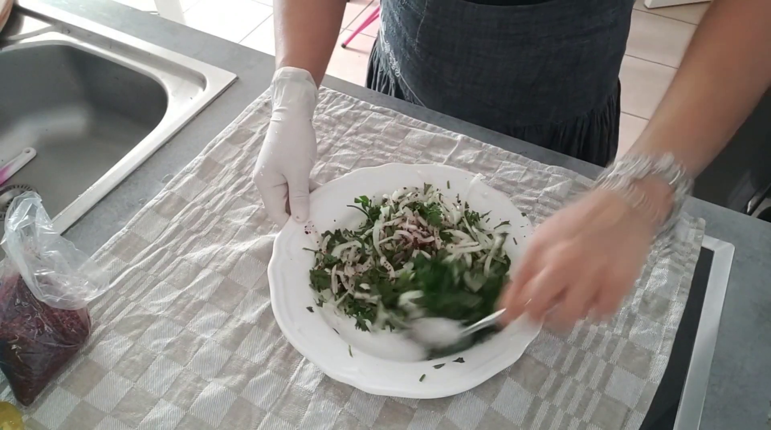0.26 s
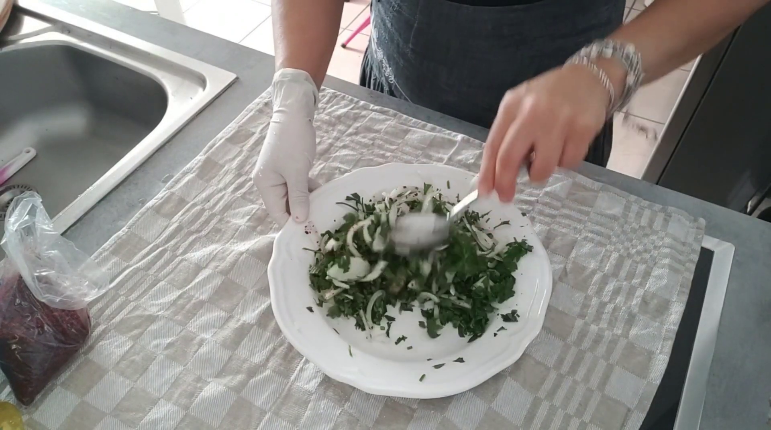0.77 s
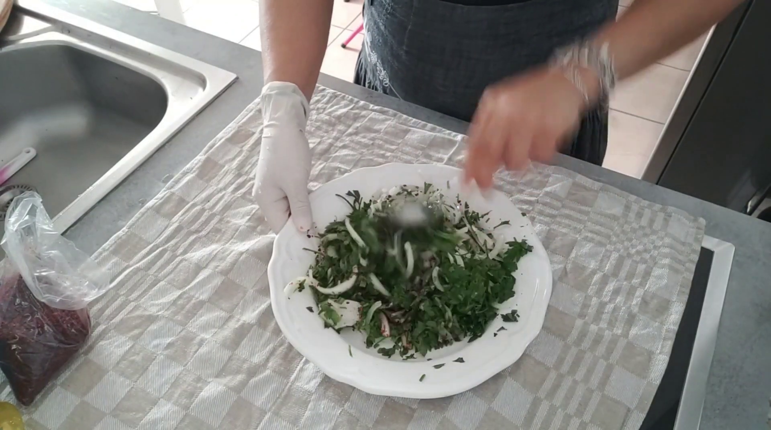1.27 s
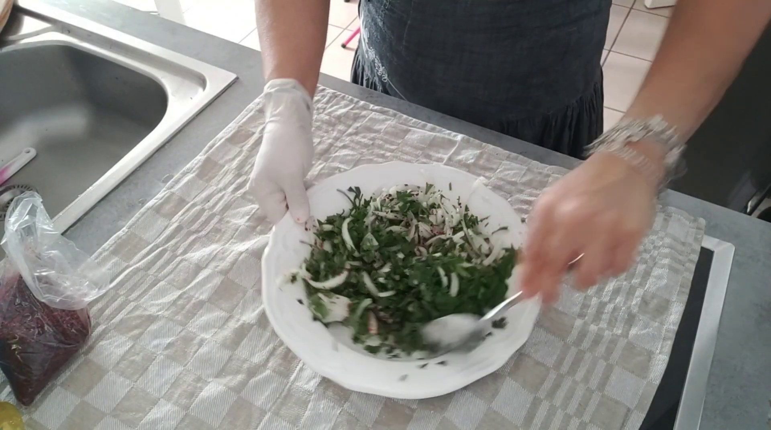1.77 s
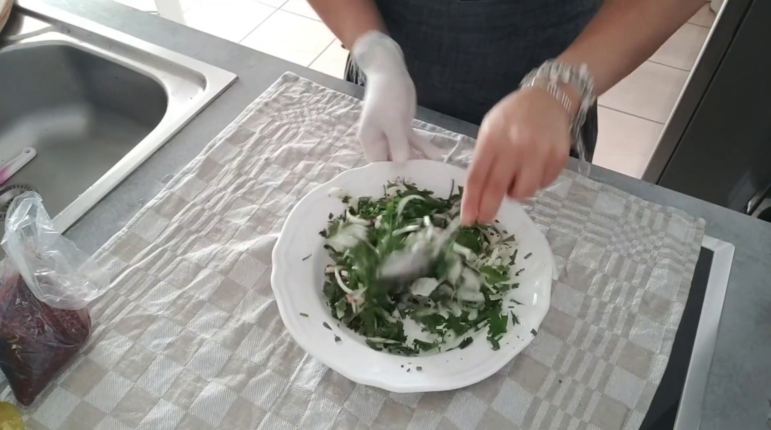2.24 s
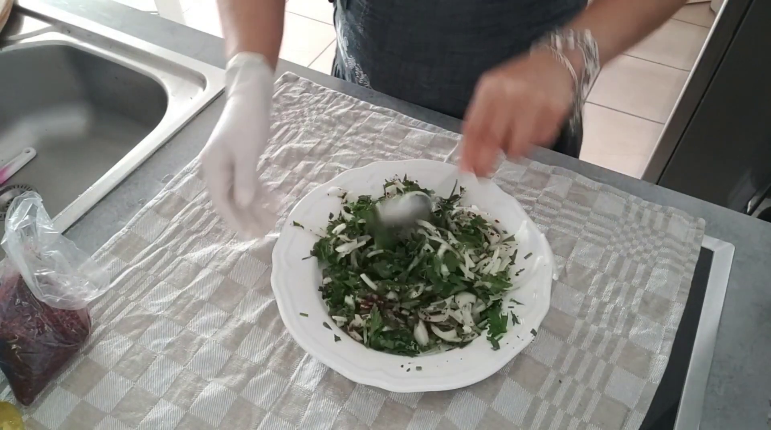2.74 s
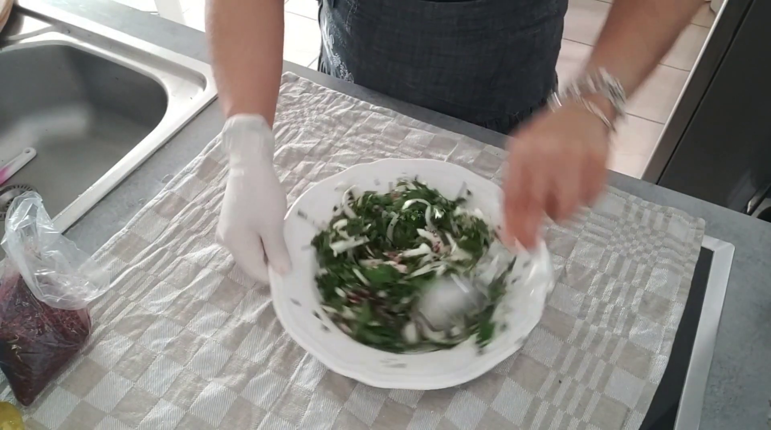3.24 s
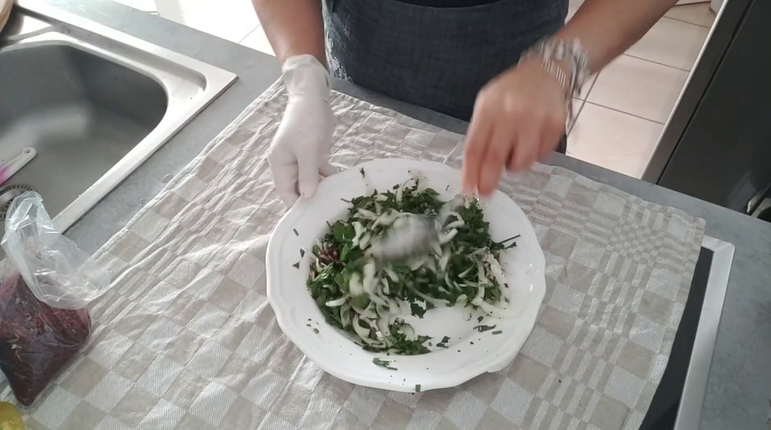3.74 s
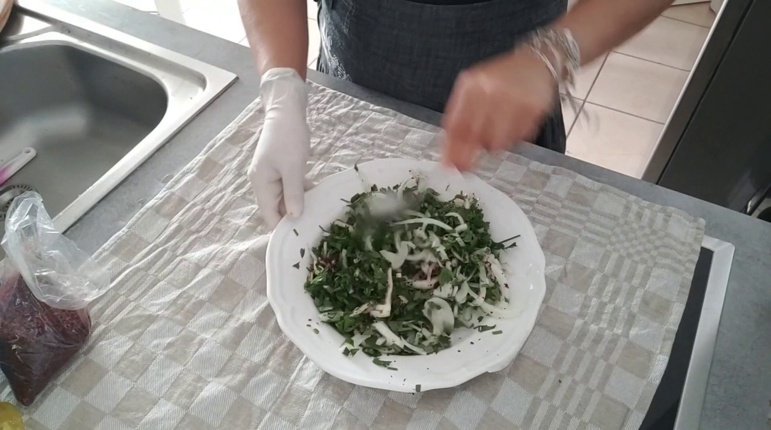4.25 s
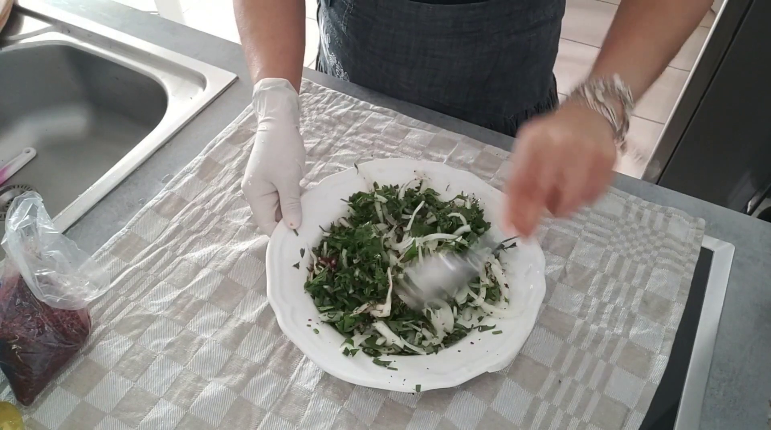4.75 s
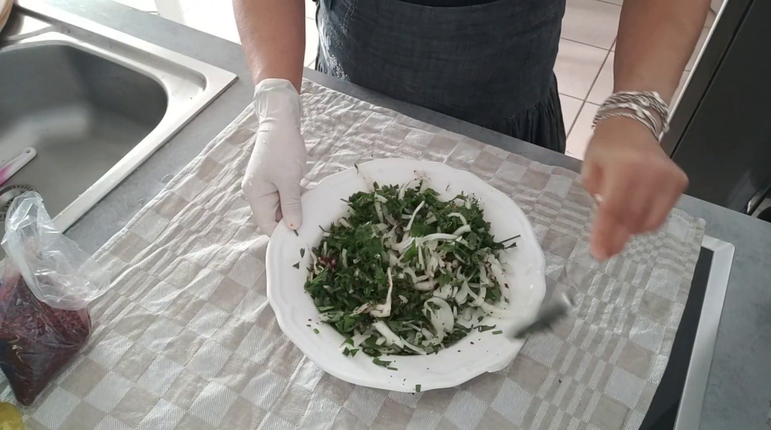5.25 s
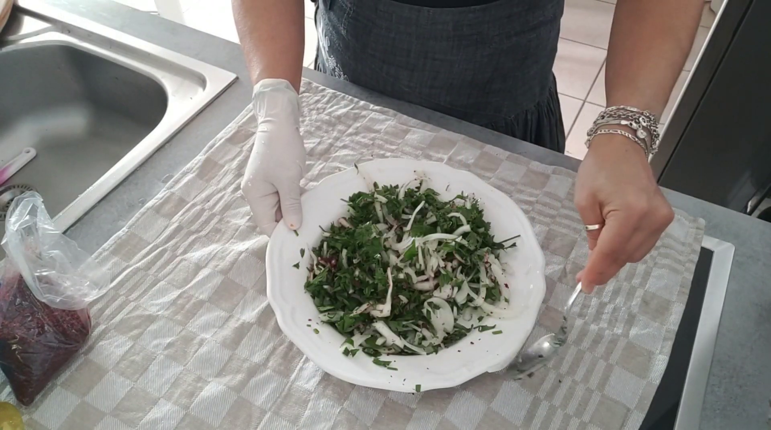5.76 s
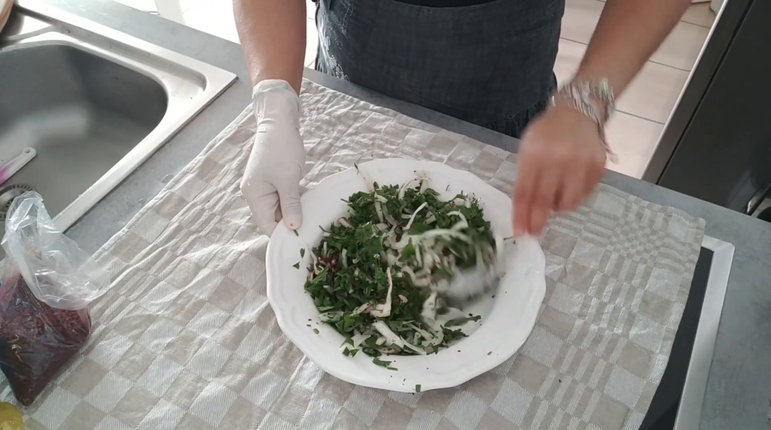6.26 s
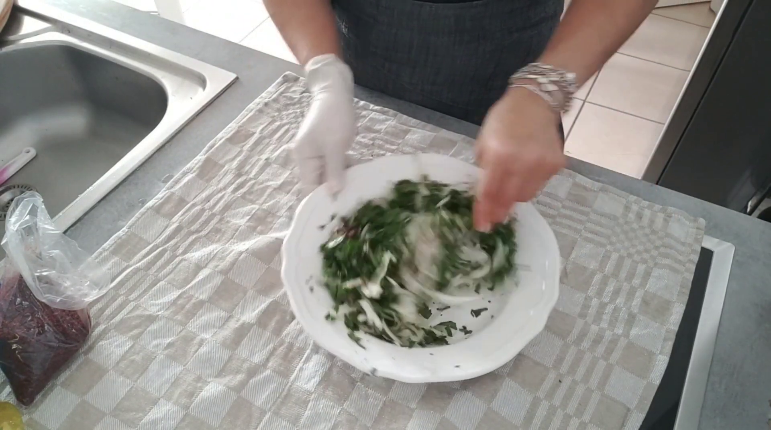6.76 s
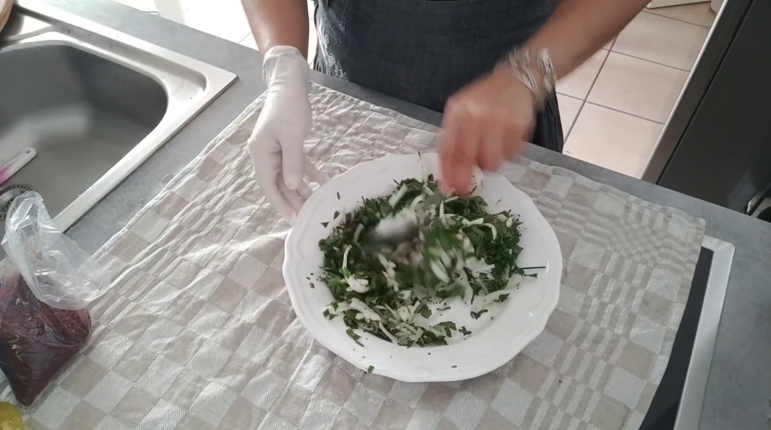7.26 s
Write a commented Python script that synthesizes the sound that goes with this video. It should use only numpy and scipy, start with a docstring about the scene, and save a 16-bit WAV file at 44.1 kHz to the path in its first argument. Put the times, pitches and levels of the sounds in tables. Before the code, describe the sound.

A close stereo microphone in a small, reflective kitchen hears a steel spoon tossing wet salad on a china plate. From the start, soft crisp swishes of leaves come in quick uneven strokes, with a very faint thin squeak around 0.4 seconds and a tick with a dull plate thud near 1.0. At about 1.75 a sharp bright clink rings briefly and drags into a gritty scrape. Rustling continues with small ticks near 2.0 and 2.8; the loudest clink strikes at 3.4, followed by a short scrape. Leafy stirring goes on until about 4.8, then nearly pauses. Light contacts return from 5.9, with chattering taps around 6.2 to 6.3 and another at 6.6, plus muffled thuds on the padded counter. Swishes resume near 6.8, and a crisp tick comes at 7.3. Beneath lie dull rumble, low hum and a distant deep drone, sagging slightly, then climbing slowly in pitch.

```python
"""A spoon clinks and drags on a china plate while wet salad leaves rustle with each stroke of it.
Decaying sine modes make the ringing steel and china, noise bursts the cracks of contact, and swarms
of tiny clicks the leaves; spoon and stalks tick and steel squeaks once on the glaze. A small tiled kitchen
echoes all of these. The plate thuds and rubs on its cloth-covered counter, without echo, over rumble, a low
hum and a far drone that sags a little in pitch and then slowly climbs."""
import sys
import numpy as np
from scipy import signal
from scipy.fft import rfft, irfft, next_fast_len
from scipy.io import wavfile
from scipy.ndimage import uniform_filter1d

SR = 44100
rng = np.random.default_rng(int(sys.argv[2]) if len(sys.argv) > 2 else 0)


def digitize_waveform(pressure):
    """Quantize a signal to 16-bit integers and store it at the path in sys.argv[1].

    Rows of a 2-D input are taken as channels; values are limited to [-1, 1].
    """
    field = np.atleast_2d(pressure).T
    bounded = np.clip(field, -1, 1)
    quanta = np.round(bounded * 32767).astype(np.int16)
    wavfile.write(sys.argv[1], SR, quanta)


N = 331191
TIME = np.arange(N) / SR
# time axis of every single ring, burst or echo: half a second
RING = TIME[:SR // 2]

# plate resonances, damped by the salad: f/Hz, level/dB, t60/s, left minus right/dB
PLATE_MODES = [(1008, -21, .06, 0), (1131, -16, .08, 3), (1358, 0, .09, 2), (1410, -6, .05, 0),
               (1466, -1, .09, 2), (1541, -5.5, .08, 1), (1800, -10, .06, 1), (1920, -15, .05, 2),
               (2240, -10, .1, 2), (2375, -8, .08, 4), (2944, -5, .08, -7), (3360, -2.5, .055, -9),
               (3735, -5, .06, -1), (3880, -7.5, .05, -5), (4110, -12, .06, -4), (4700, -15, .09, 0),
               (5700, -9, .08, 1), (6420, -7, .04, 6), (6610, -9, .05, 7), (6790, -6.5, .07, 8),
               (6900, -6, .06, 8), (7434, -6.5, .08, 8), (8030, -9, .05, -2), (8180, -6, .08, -2),
               (8400, -14, .05, 0), (9250, -17, .06, 1), (9780, -20, .06, 0), (10150, -19, .07, 0),
               (11350, -25, .08, 0), (13650, -23, .06, 6), (14650, -16.5, .08, 3), (15450, -26, .05, 4)]


def clinks(crack_db=-9, bounce_db=-6, count=3):
    """Each contact rings plate and spoon and gives a dry crack, repeated as the spoon chatters."""
    # spoon resonances: f/Hz, level/dB, t60/s, left minus right/dB
    spoon_modes = [(2414, -5.5, 0.032, 13.5), (2405, -4, 0.081, 1.5), (2360, -12, .05, 5.5),
                   (2463, -8.5, .11, 3), (3076, -12.5, 0.081, -5.5), (3240, -12.5, 0.035, -7.5),
                   (3710, -11.5, 0.04, 1), (5460, -19, 0.092, 9), (5720, -14.5, 0.058, 9),
                   (5750, -19.5, .09, 4.5), (5911, -14, .1, 5.5), (8220, -14, .06, -2.5),
                   (10100, -26, 0.058, 3.5), (10700, -22.5, .08, 0.5), (13650, -29, .06, 10.5),
                   (14480, -26.5, .06, 5.5)]
    # spoon meets plate: t/s, level/dB, deep plate ring/dB, plate treble/dB, top octave/dB,
    # spoon ring/dB, contact crack/dB, chatter interval/s
    contacts = [(0.291, -54, -16, -5, -3, -6, 10, .0028), (0.849, -64, 15, -18, -8, 2, 0, .003),
                (0.9851, -55, 7.5, 9, -8, -16, 13, 0.0011), (1.0733, -56, 12.5, -14, -2, 2, -4, .003),
                (1.752, -42, -5, 21, 3, -17, -7, .0017), (1.755, -17, -2, -1.5, -2, -37, 5, 0.0032),
                (1.878, -43, 7.5, 8, -19, -23, 4, .0009), (2.583, -58, 13, -9, -2.5, 12, -3, .004),
                (3.393, -12, -0.5, 0.5, -5.5, -12, 5.5, 0.002), (4.138, -57, 3, 2, -10, -6.5, 14, 0.0032),
                (4.252, -55, 3, -4, -16.5, -8, 1, 0.0016), (5.930, -42, -11, -10.5, -27, -4, 5.5, 0.0012),
                (6.008, -50.5, -15.5, -10, -13, -19.5, 6.5, .0021),
                (6.238, -30.5, 7.5, 2, 0, -24.5, 10, 0.0051),
                (6.3056, -21.5, -8.5, -12, -15, 9, 9.5, 0.0013), (6.323, -35, -9, -18, -10, 6, 5, 0.0024),
                (6.609, -26.5, 5, -1, -3, -25, 10, .003), (7.3237, -53, 0.5, 8.5, -14, -23.5, 14, 0.00056)]
    out = np.zeros((2, N))
    for s, db, deep_db, treble_db, top_db, spoon_db, contact_db, chatter_s in contacts:
        plate = ring(PLATE_MODES, deep_db, treble_db, build_cycles=7.7)
        spoon = ring(spoon_modes, 0, 0, build_cycles=1.0)
        sound = plate + undb(spoon_db) * spoon
        for bounce in range(count):
            bounce_gain = undb(contact_db + crack_db + bounce * bounce_db)
            add(sound, bounce * chatter_s, bounce_gain * crack())
        # leaves under the spoon cushion most blows and take off the top octave
        cushioned = colour(sound, [(8700, 0), (12000, top_db)])
        add(out, s, undb(db) * cushioned)
    return out


def ring(modes, deep_db, treble_db, build_cycles):
    """Struck-body modes build up over some cycles and decay; the contact place weights deep and high ones."""
    out = 0
    for hz, db, t60, pan_db in modes:
        db = db + np.interp(hz, [1550, 2200, 4100, 6400], [deep_db, 0, 0, treble_db])
        build = 1 - np.exp(-RING * hz / build_cycles)
        # short waves reach the two microphones out of step
        out_of_step = rng.uniform(-.5, .5, (2, 1)) * min(hz / 5000, 1) ** 2
        phase = 2 * np.pi * (rng.random() + out_of_step)
        # every strike detunes each mode by about 0.1 %
        detuned_hz = hz * (1 + .001 * rng.standard_normal())
        wave = np.sin(2 * np.pi * detuned_hz * RING + phase)
        left_right_db = db + np.array([[pan_db], [-pan_db]]) / 2
        out = out + undb(left_right_db) * fade(t60) * build * wave
    return out


def crack(low_t60=0.074, high_t60=0.018, high_db=0, impact_db=5, impact_t60=0.0045):
    """Dry noise of a contact: a hard instant of impact, then a short burst whose treble dies first."""
    # spectrum of the contact noise: f/Hz, relative level/dB
    crack_spectrum = [(100, -13), (300, -0.5), (600, -7.5), (850, -2.5), (1150, 3.5), (2000, -0.5),
                      (2650, -4), (3600, 3.5), (4400, -9.5), (5000, -13), (5600, -2.5), (7400, 2.5),
                      (9500, -10), (12000, -14), (15500, -14), (17000, -34)]
    low, high = split(unit(colour(diffuse(len(RING)), crack_spectrum)), hz=4070)
    low_burst = low * fade(low_t60)
    high_burst = undb(high_db) * high * fade(high_t60)
    impact = undb(impact_db) * (low + high) * fade(impact_t60)
    return low_burst + high_burst + impact


def drags(slips_per_s=700, grit_db=-4, grit_t60=0.028, grit_hz=1700):
    """Uneven slips of steel on glaze keep the plate ringing, mostly in its deep modes, with a gritty rasp."""
    # the spoon drags on the glaze: start t/s, length/s, level/dB, ring above the deep modes/dB
    drag_strokes = [(.24, 0.26, -55, 3), (1.008, .075, -43.5, -19), (1.785, 0.072, -22.5, -12.5),
                    (1.852, .05, -27, -12.5), (2.198, 0.028, -48, -12), (2.596, 0.085, -49.5, -8.5),
                    (3.418, .09, -33, 3.5), (4.75, 0.069, -53.5, -11.5), (6.661, .055, -39.5, -9),
                    (7.33, .078, -61.5, -3)]
    out = np.zeros((2, N))
    for s, length, db, treble_db in drag_strokes:
        n = int(length * SR)
        slips = (rng.random(n) < slips_per_s / SR) * rng.standard_normal(n)
        slips = slips * signal.windows.tukey(n, .5)
        slips /= np.sqrt(np.sum(slips ** 2)) + 1e-9
        rasp_spectrum = [(grit_hz / 4, -30), (grit_hz, 0), (grit_hz * 2, -22), (grit_hz * 6, -45)]
        rasp = colour(diffuse(len(RING), alike_hz=2000), rasp_spectrum)
        grit = unit(rasp) * fade(grit_t60)
        # the deep boost cancels the treble gain, so the deepest modes keep their level
        plate = undb(treble_db) * ring(PLATE_MODES, -treble_db, 0, build_cycles=3.6)
        body = plate + undb(grit_db) * grit
        add(out, s, undb(db) * signal.fftconvolve(slips[None], body, axes=1))
    return out


def leaves(grains_per_s=2400, spread_db=2.5, hiss_db=-7, level_db=-3.0, sheen_db=2.5, flutter_db=1.26):
    """Wet leaves rub in small jerks: unequal tiny clicks over a soft swish; the top sparkles unevenly."""
    # spectrum of the rustle: f/Hz, relative level/dB
    leaf_spectrum = [(300, -8.5), (900, 0), (1500, 0), (2400, -0.5), (3800, -7.5), (4600, -19.5),
                     (5700, -5.5), (7200, -0.5), (8400, -0.5), (11000, -15.5), (15000, -14), (16500, -16.5)]
    # the spoon pushes through the leaves: t of the hardest push/s, level/dB, length/s, top-octave sparkle/dB
    pushes = [(0.105, -62.5, .4, 9), (.29, -59, 0.47, -4), (0.48, -60, 0.73, 2), (0.687, -65, 0.21, 11),
              (1.005, -50.5, 0.35, 2), (1.38, -54.5, 0.31, 7.5), (1.697, -61.5, 0.27, 5),
              (2.063, -57.5, 0.99, -1), (2.565, -54, 0.4, -0.5), (2.73, -62.5, .2, 8),
              (2.972, -55.5, 0.33, 1), (3.124, -55, 0.17, -2), (3.302, -58.5, 0.48, -4),
              (3.68, -58, 0.67, -2), (4.08, -55, 0.5, 0), (4.453, -54.5, 0.37, 0.5), (4.78, -64.5, .35, 2),
              (4.94, -66, .35, 4), (5.69, -63, 0.19, -2.5), (6.15, -67.5, .4, -1.5),
              (6.84, -56, 0.53, -0.5), (7.309, -57, 0.38, 1.5), (7.5, -68.5, 0.27, 1)]
    size = undb(spread_db * np.minimum(rng.exponential(size=N), 5))
    grains = (rng.random(N) < grains_per_s / SR) * size * rng.standard_normal((2, N))
    rubbing = unit(grains) + undb(hiss_db) * diffuse(N)
    swish, sparkle = split(unit(colour(rubbing, leaf_spectrum)), hz=10700)
    # overlapping pushes add in power
    swish_power = sparkle_power = 0
    for s, db, length, sparkle_db in pushes:
        push = undb(db) * stroke(s, length)
        swish_power = swish_power + push ** 2
        sparkle_power = sparkle_power + (push * undb(sparkle_db)) ** 2
    uneven_sparkle = sparkle * np.sqrt(sparkle_power) * undb(sheen_db * walk(12))
    rustle = swish * np.sqrt(swish_power) + uneven_sparkle
    return rustle * undb(level_db + flutter_db * walk(70))


def stroke(s, length, rise_share=0.42, depth_db=20):
    """Gain of one push: it swells to its peak at s and dies away more slowly, depth_db down at its ends."""
    before = (s - TIME) / rise_share
    after = (TIME - s) / (1 - rise_share)
    away = np.maximum(before, after) / length
    return undb(-depth_db * np.minimum(away, 10))


def snaps(t60=0.0052, edge_db=-25):
    """Short crisp ticks of spoon or leaf stalks: noise around one pitch."""
    # a tick: t/s, level/dB, f/Hz, reach to either side/octaves
    ticks = [(0.9874, -31, 7750, 1), (2.043, -37.5, 7140, 0.39), (2.828, -47, 7050, 0.48),
             (2.946, -56, 13000, 1), (4.078, -48.5, 12140, 0.98), (5.645, -49.5, 7000, 0.43),
             (5.685, -48.5, 6940, .4), (7.3259, -31.5, 7650, 0.88)]
    out = np.zeros((2, N))
    for s, db, hz, octaves in ticks:
        reach = 2 ** octaves
        tick = colour(diffuse(len(RING)), [(hz / reach, edge_db), (hz, 0), (hz * reach, edge_db)])
        add(out, s, undb(db) * unit(tick) * fade(t60))
    return out


def squeak():
    """Very fast stick-slip of steel on wet glaze whistles for a moment: a thin gliding tone."""
    # pitch and loudness of the squeak: t/s, f/Hz, level/dB
    squeak_path = [(.395, 11700, -80), (.408, 11300, -55), (.43, 11000, -53), (.445, 11500, -54),
                   (.46, 11400, -85)]
    s, hz, db = np.transpose(squeak_path)
    tone = glide(np.interp(TIME, s, hz), np.interp(TIME, s, db), waver=0.0133)
    return tone * (TIME > s[0]) * (TIME < s[-1])


def room(x, t60=0.47, treble_t60=0.32, tail_db=-6, early_db=-6.5, early_t60=0.029):
    """Quick reflections from counter and cupboards, then the kitchen's tail, shorter in the treble."""
    low, high = split(diffuse(len(RING)), hz=5000)
    # both parts of the echo start softly behind the direct sound
    tail = (low * fade(t60) + high * fade(treble_t60)) * (1 - fade(0.023))
    early = diffuse(len(RING), alike_hz=2000) * fade(early_t60) * (1 - fade(0.0084))
    response = (undb(tail_db) * unit(tail) + undb(early_db) * unit(early)) / np.sqrt(len(RING))
    return x + signal.fftconvolve(x, response, axes=1)[:, :N]


def bumps(rub_t60=.3):
    """The plate rocks on the cloth and thuds dully on the counter; turned, it rubs with a short note."""
    # what plate, cloth and counter thud with: f/Hz, level/dB, t60/s
    thud_modes = [(66, -1, .33), (126, -3.5, 0.21), (182, -6, 0.19), (378, -6.5, 0.11)]
    # the plate is pushed down onto the counter: t/s, level/dB
    presses = [(.99, -36), (3.395, -40), (6.311, -35.5), (6.612, -33), (6.803, -46), (7.327, -38.5)]
    # the plate rubs dully as it is turned: t/s, f/Hz, level/dB
    turns = [(.388, 394, -43), (1.899, 1116, -45), (2.203, 686, -46.5), (7.24, 531, -48)]
    out = np.zeros((2, N))
    thud = sum(knock(*mode) for mode in thud_modes)
    for s, db in presses:
        add(out, s, undb(db) * thud)
    for s, hz, db in turns:
        add(out, s, knock(hz, db, rub_t60))
    return out


def knock(hz, db, t60, rise_s=.03):
    """A dull note: one sine with a soft start that dies away."""
    return undb(db) * np.sin(2 * np.pi * hz * RING) * fade(t60) * (1 - fade(rise_s))


def background():
    """The kitchen behind the plate: room rumble, appliance hum and a far drone."""
    return rumble() + hum() + drone()


def rumble(level_db=-45.5):
    """Dull, steady room noise, strongest in the bass."""
    # spectrum of the room noise: f/Hz, relative level/dB
    rumble_spectrum = [(12, -14.5), (25, -1), (36, -11.5), (60, -8.5), (110, -14.5), (150, -15),
                       (240, -20.5), (340, -19.5), (470, -24.5), (650, -29.5), (1200, -29), (2000, -40.5),
                       (4000, -49), (4700, -64), (6500, -50.5), (15000, -72.5)]
    return unit(colour(diffuse(N), rumble_spectrum)) * undb(level_db)


def hum():
    """An appliance hums on a few tones that waver randomly in strength and phase."""
    # appliance hum: f/Hz, level/dB, rate of wavering that widens the tone/Hz
    hum_tones = [(145.3, -55.5, 8.9), (153.2, -60.5, 16), (359.4, -63, 16), (464.6, -64, 16)]
    out = 0
    for hz, db, width in hum_tones:
        wavering = walk(width) + 1j * walk(width)
        out = out + undb(db) * np.real(wavering * np.exp(2j * np.pi * hz * TIME))
    return out


def drone(turn_s=2.7, low_hz=40.8, sag_hz_per_s=1.4, climb_hz_per_s=2.6):
    """A far, deep tone slows to its lowest pitch, then speeds up steadily."""
    # loudness of the drone: t/s, level/dB
    drone_level = [(0, -47), (.9, -51), (1.5, -51.5), (2.3, -40.5), (5.1, -38.5), (6, -43), (7.5, -47)]
    since = TIME - turn_s
    hz = low_hz + np.maximum(-sag_hz_per_s * since, climb_hz_per_s * since)
    return glide(hz, np.interp(TIME, *np.transpose(drone_level)), waver=0.0093)


def glide(hz, db, waver):
    """A tone that follows a pitch and a level, wavering in pitch by a share of it."""
    phase = 2 * np.pi * np.cumsum(hz * (1 + waver * walk(340))) / SR
    return np.sqrt(2) * np.sin(phase) * undb(db)


def diffuse(n, alike_hz=580):
    """Stereo noise as two close microphones hear a room: alike in the bass, unrelated above."""
    mid, side = rfft(rng.standard_normal((2, n)))
    likeness = 1 / (1 + (np.fft.rfftfreq(n, 1 / SR) / alike_hz) ** 5)
    mid, side = mid * np.sqrt(1 + likeness), side * np.sqrt(1 - likeness)
    return irfft([mid + side, mid - side], n) / np.sqrt(2)


def colour(x, points):
    """Filter by a spectrum of (Hz, dB) points, causally (minimum phase) so that attacks stay sharp."""
    hz, db = np.transpose(points)
    n = x.shape[-1]
    size = 2 * next_fast_len(n)
    f = np.maximum(np.fft.rfftfreq(size, 1 / SR), 1)
    gain = undb(np.interp(np.log(f), np.log(hz), db))
    # folding the cepstrum onto positive times makes the filter causal
    cepstrum = irfft(np.log(gain))
    cepstrum[1:size // 2] *= 2
    cepstrum[size // 2 + 1:] = 0
    return irfft(rfft(x, size) * np.exp(rfft(cepstrum)))[..., :n]


def split(x, hz):
    """The parts of a sound below and above a frequency."""
    filters = [signal.butter(5, hz, kind, fs=SR, output="sos") for kind in ("low", "high")]
    return [signal.sosfilt(sos, x) for sos in filters]


def walk(rate):
    """Smooth random wander with rms 1 that takes a new course rate times a second."""
    k = int(SR / rate)
    steps = np.repeat(rng.standard_normal(N // k + 1), k)
    return unit(uniform_filter1d(steps, k)[:N])


def fade(t60):
    """Exponential decay by 60 dB in t60 seconds."""
    return np.exp(-np.log(1000) * RING / t60)


def undb(db):
    """Decibels to gain."""
    return 10 ** (np.asarray(db) / 20)


def unit(x):
    """Scale to rms 1."""
    return x / np.sqrt(np.mean(x ** 2))


def add(out, s, x):
    """Mix a sound in at time s, in place."""
    rest = out[:, int(s * SR):]
    rest[:, :x.shape[-1]] += x[..., :rest.shape[1]]


def scene():
    """Spoon, plate and salad echo in the kitchen; bumps and background are added dry."""
    echoing = clinks() + drags() + leaves() + snaps() + squeak()
    return room(echoing) + bumps() + background()


def record(dry, ceiling=.85, top_hz=16200):
    """Round off the very loudest peaks below a ceiling, then cut the top steeply."""
    rounded = dry / (1 + (dry / ceiling) ** 4) ** (1 / 4)
    return signal.sosfilt(signal.ellip(8, .2, 70, top_hz, fs=SR, output="sos"), rounded)


dry = scene()
out = record(dry)
digitize_waveform(out)
```